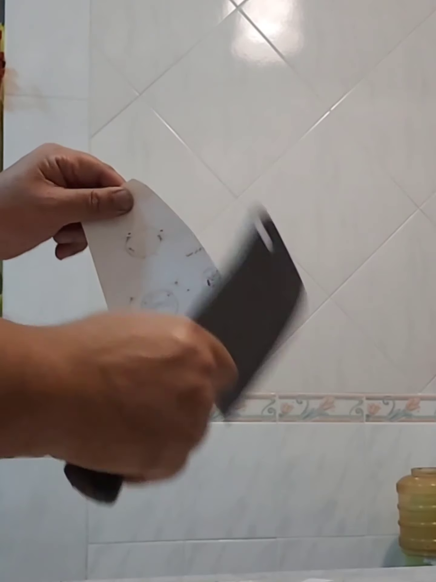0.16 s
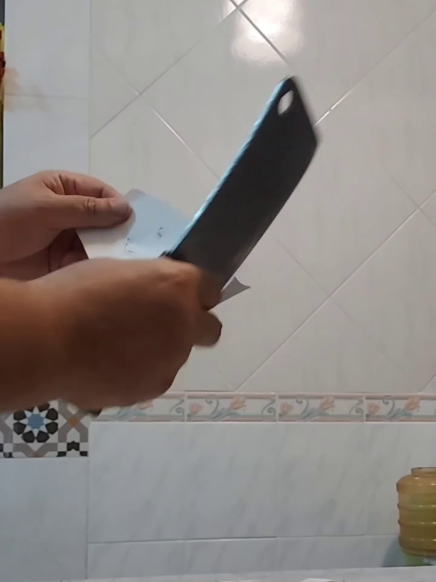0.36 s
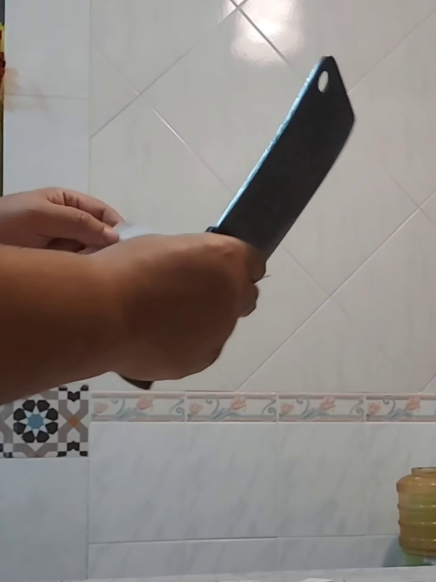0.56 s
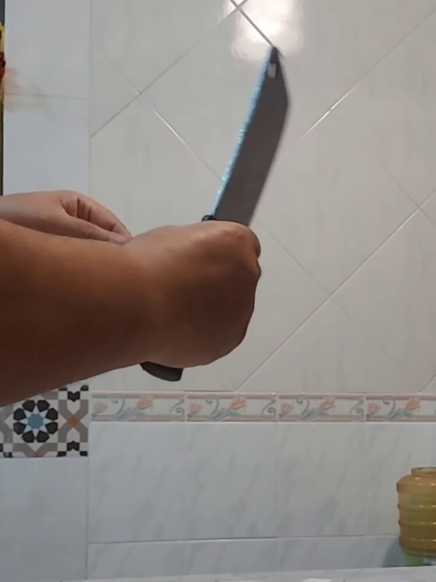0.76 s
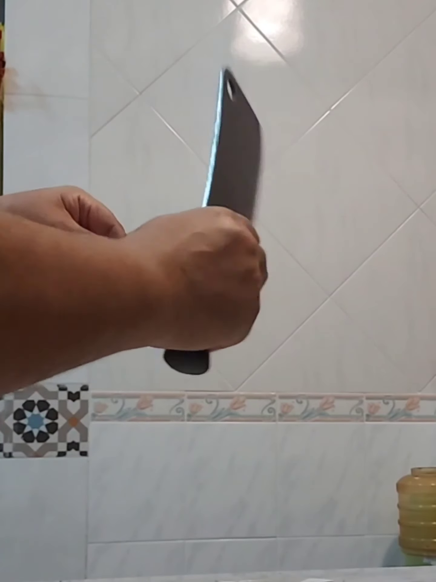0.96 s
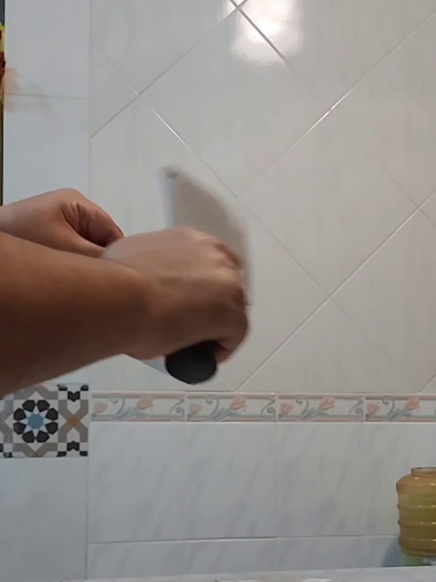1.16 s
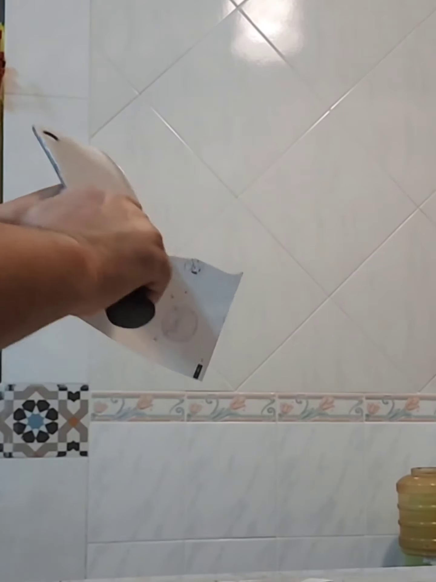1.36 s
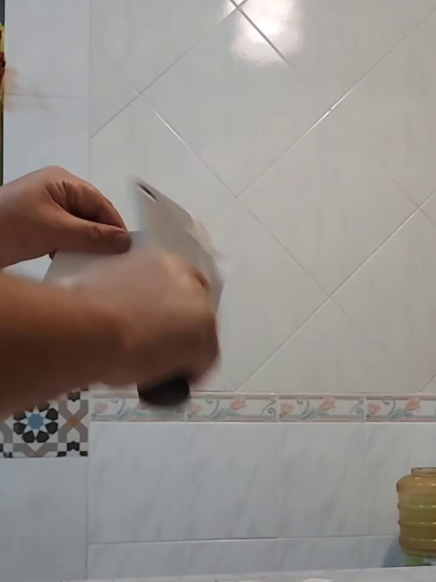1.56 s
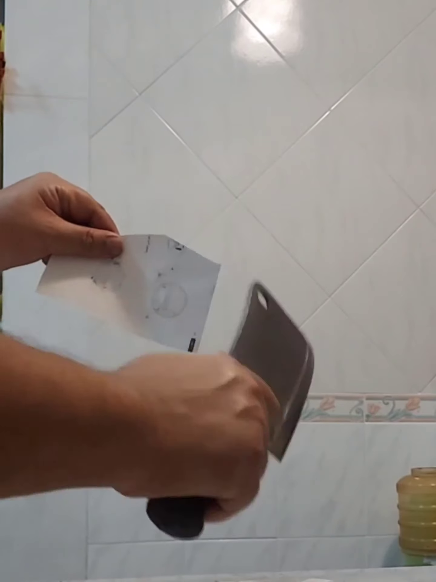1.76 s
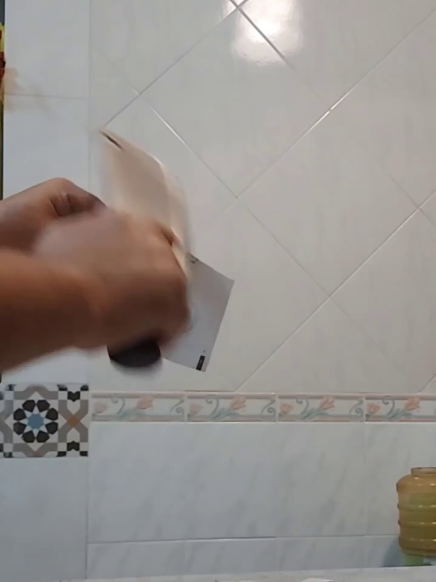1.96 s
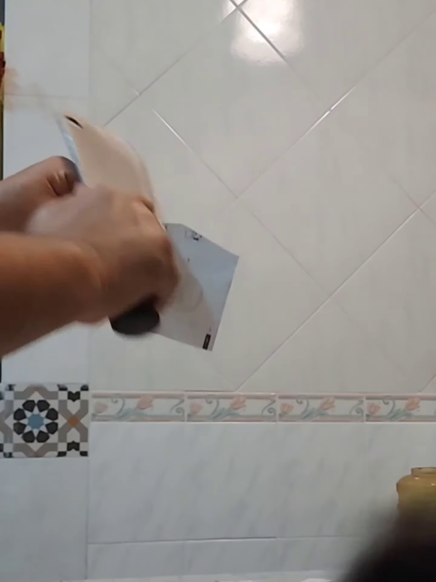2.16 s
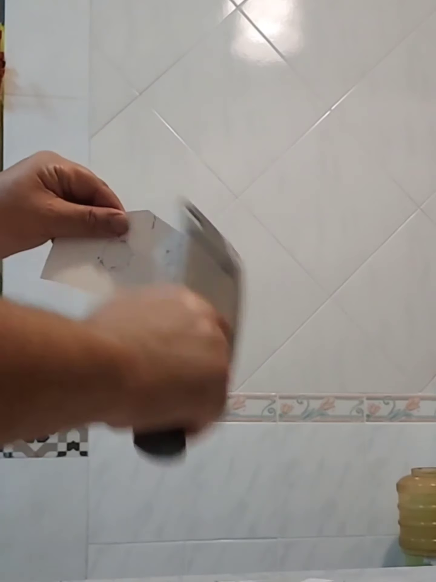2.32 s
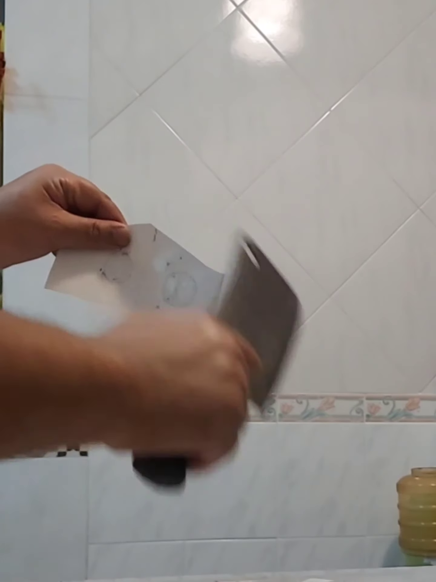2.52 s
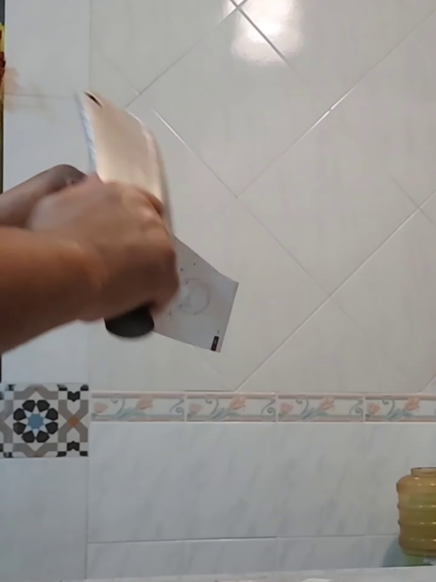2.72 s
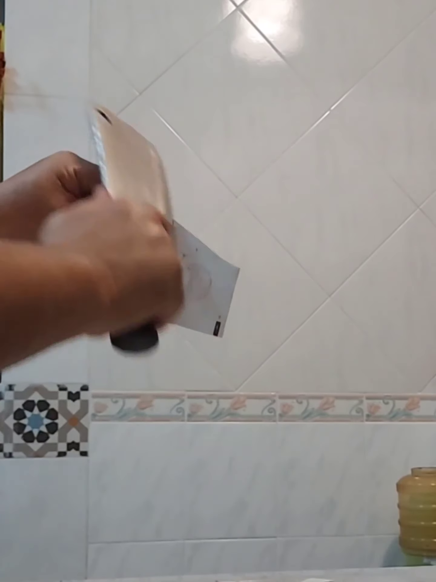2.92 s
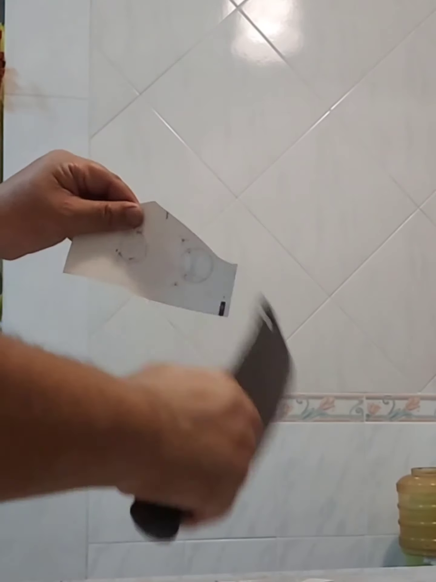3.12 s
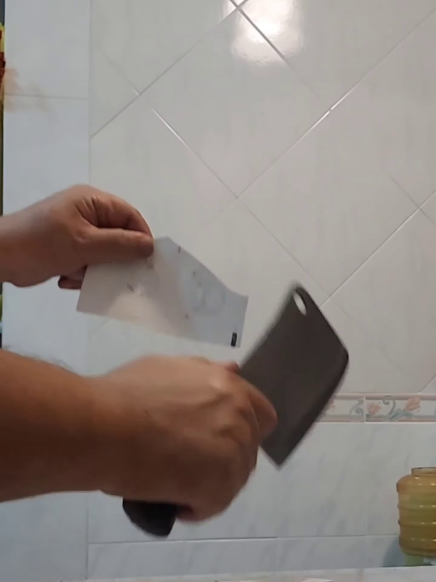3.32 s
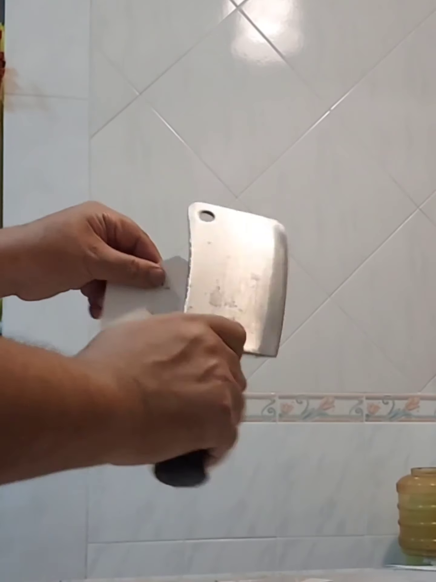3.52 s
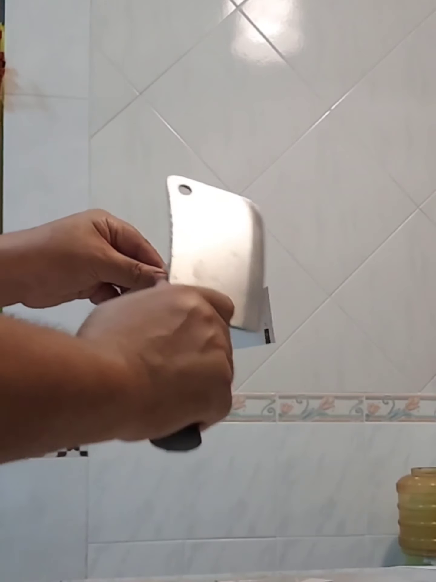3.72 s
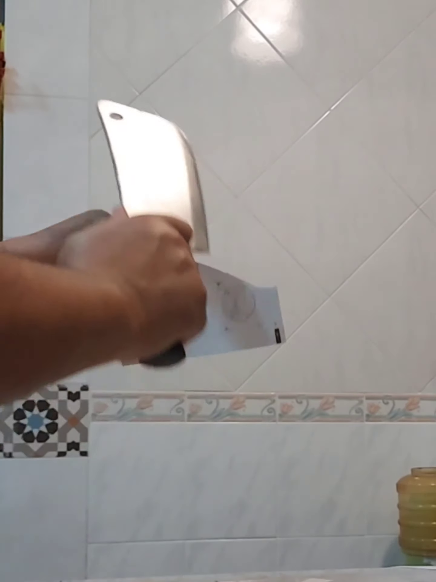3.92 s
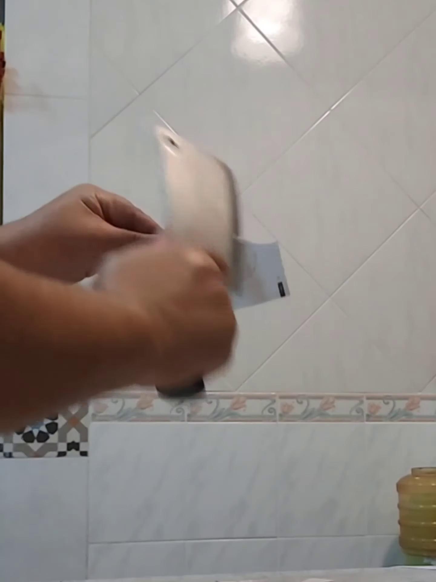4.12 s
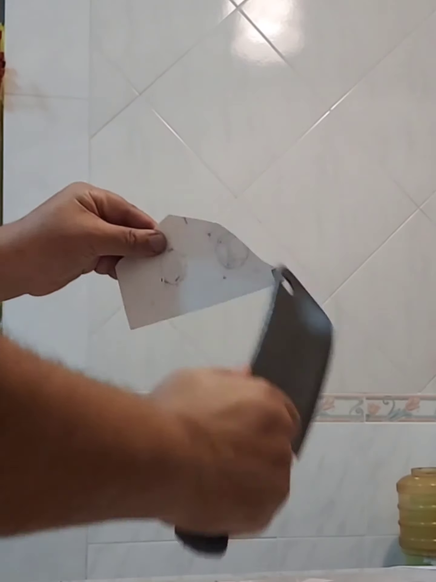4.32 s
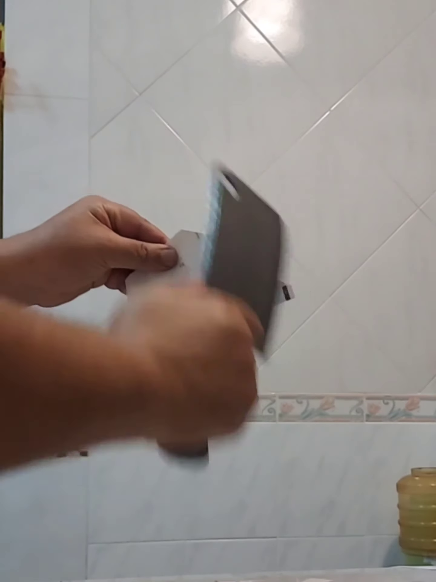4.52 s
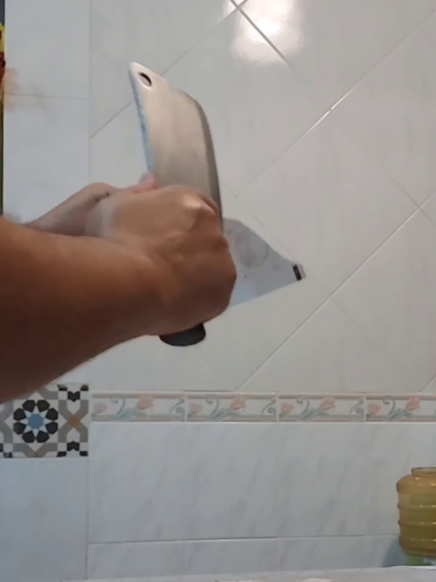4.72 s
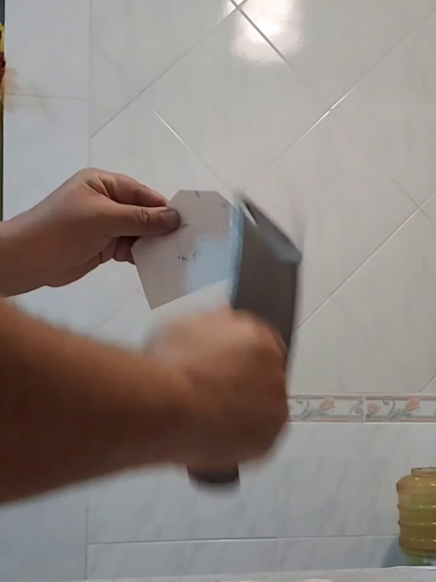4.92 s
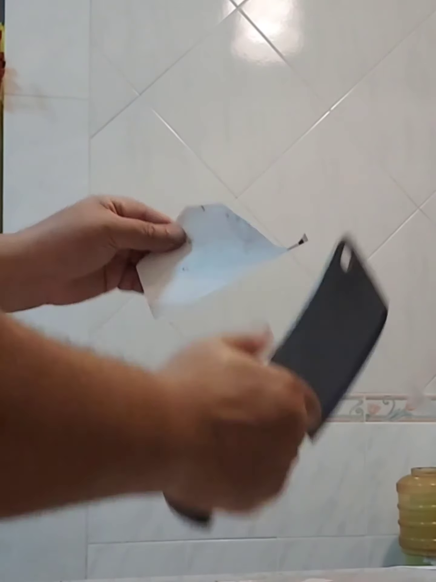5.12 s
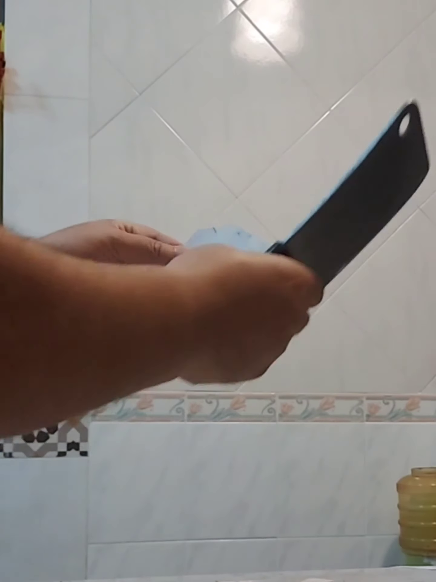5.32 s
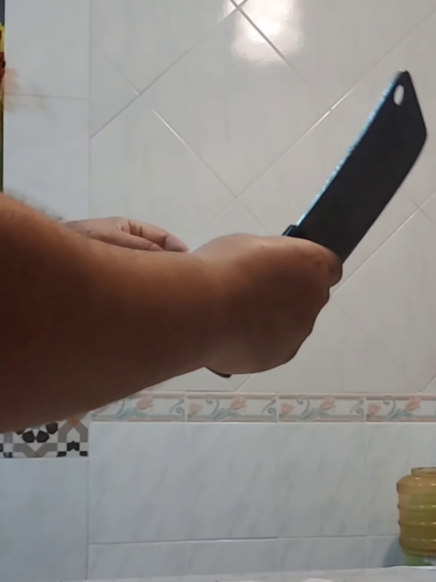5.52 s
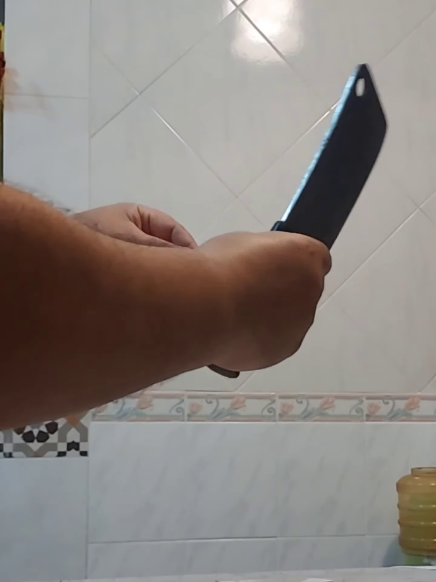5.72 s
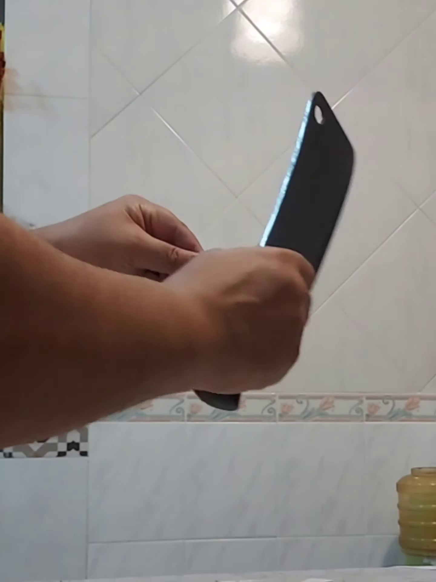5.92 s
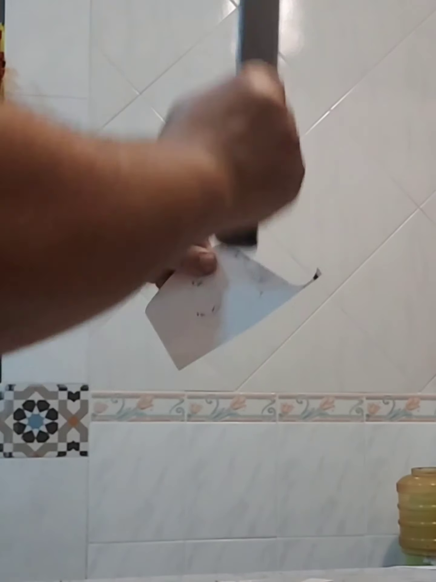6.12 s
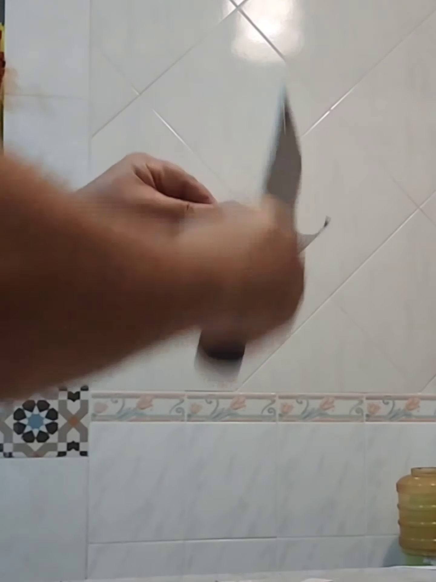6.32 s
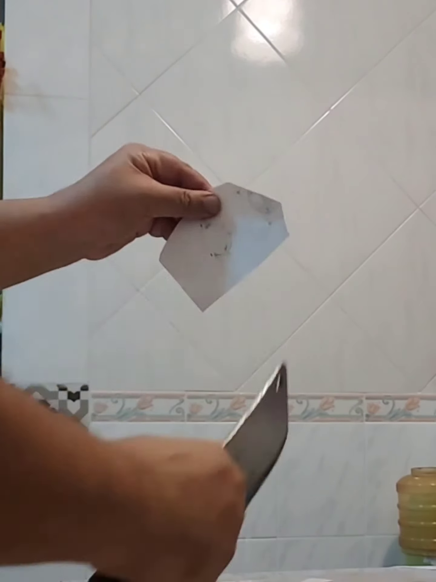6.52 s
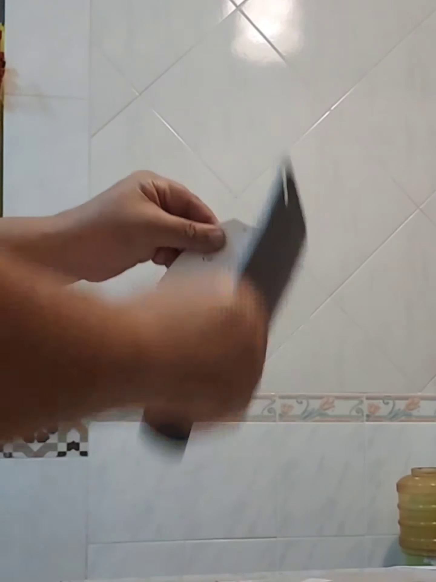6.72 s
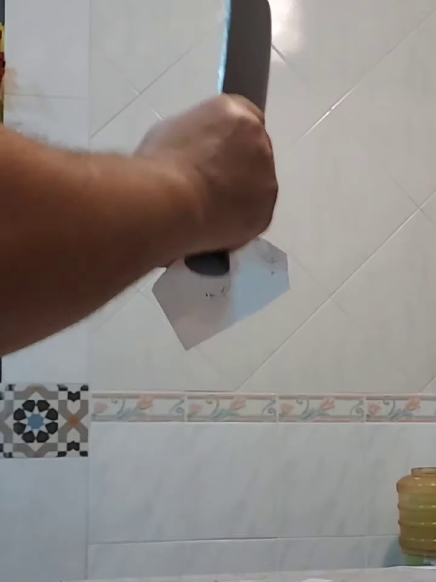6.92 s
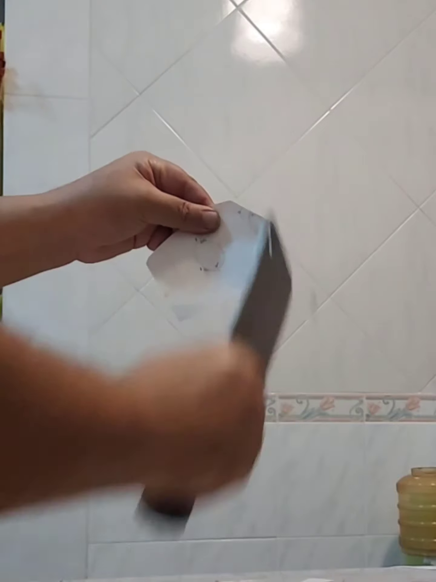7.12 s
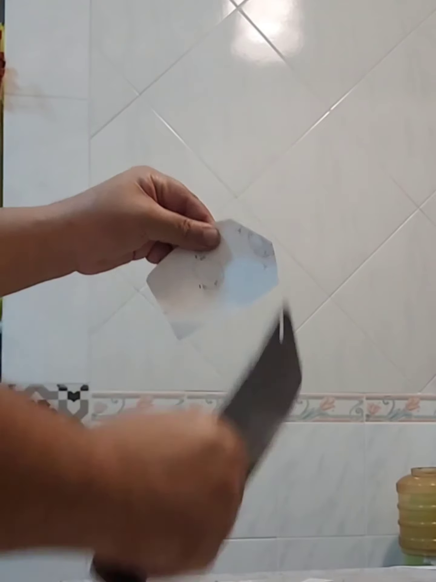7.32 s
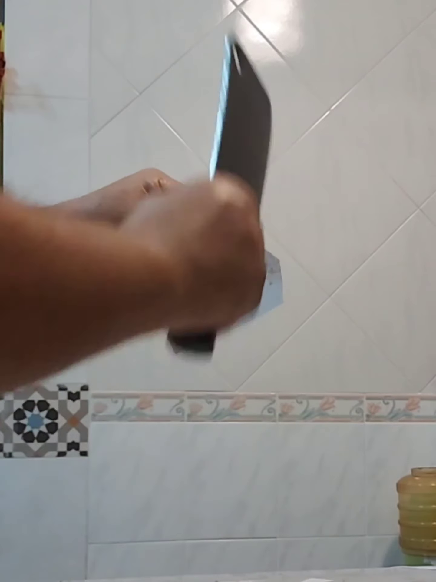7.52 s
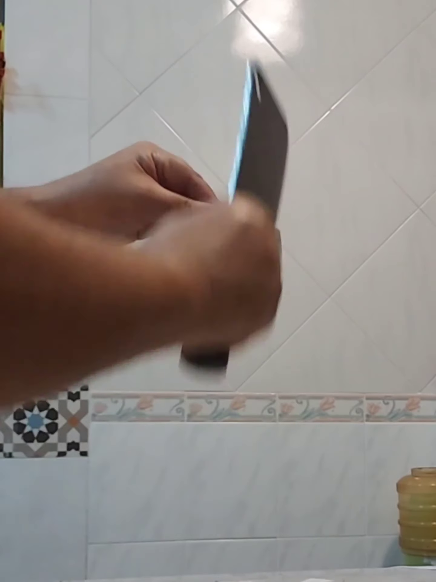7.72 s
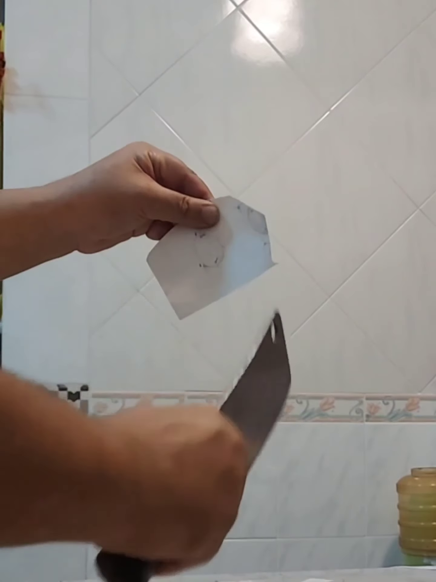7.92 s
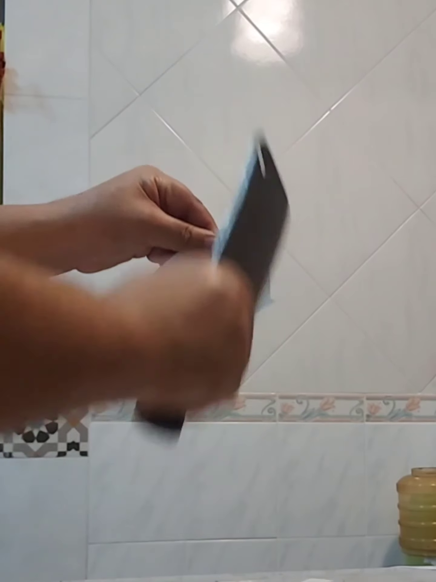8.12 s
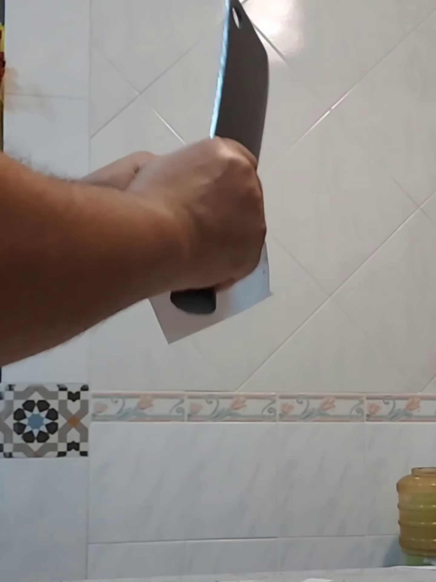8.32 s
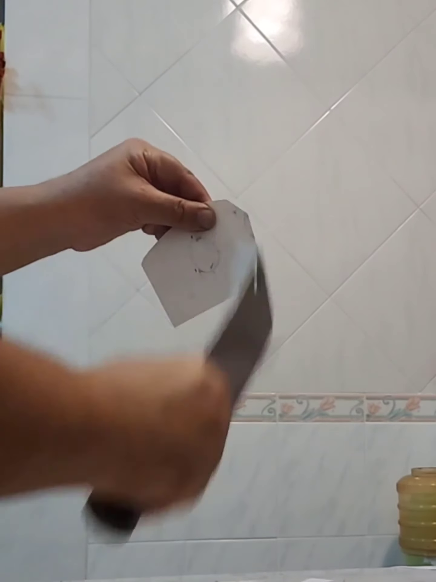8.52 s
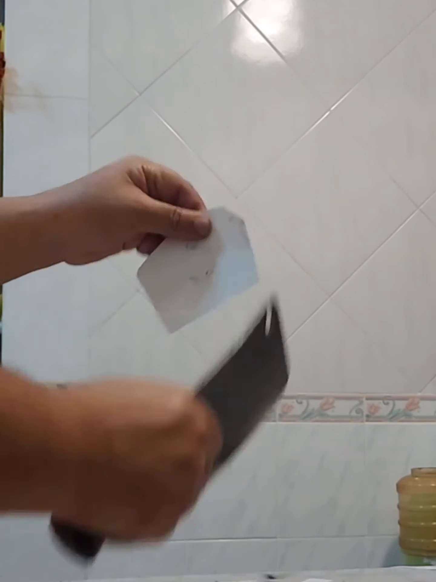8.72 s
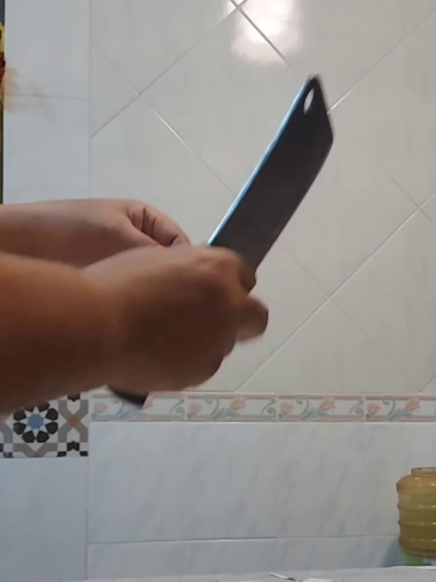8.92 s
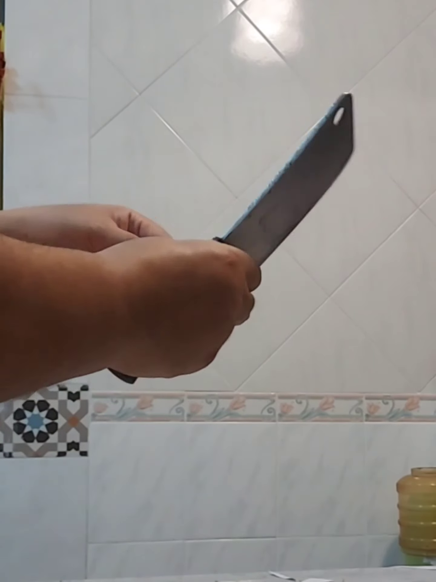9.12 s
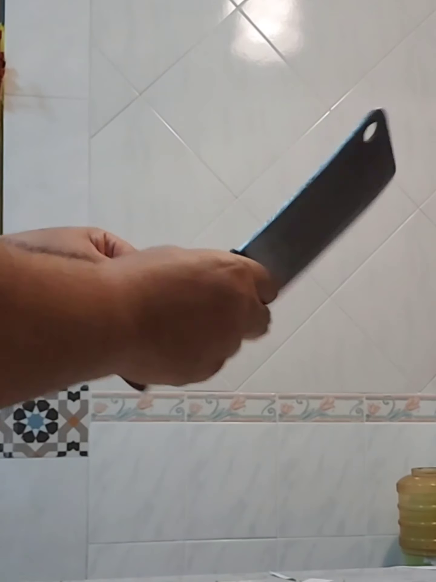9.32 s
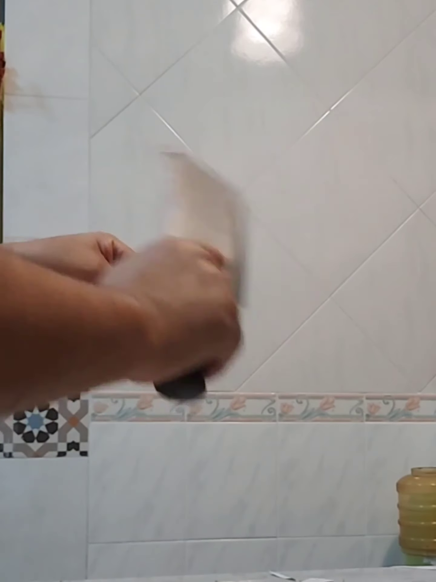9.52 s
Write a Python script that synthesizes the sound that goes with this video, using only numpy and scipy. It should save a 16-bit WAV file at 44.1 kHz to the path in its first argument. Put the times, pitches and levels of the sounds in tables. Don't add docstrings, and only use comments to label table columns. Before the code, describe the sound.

The tail of one slice, then a pause and spaced paper cuts: some short and dry, some drawn out and swelling, one abrupt hard chop past the middle, then three quicker crackling slices. Small ticks and soft paper handling come between. The sound is close and bright, with short tiled-room reverberation over quiet room tone and a wavering low engine drone that grows later.

```python
import sys
import numpy as np
from scipy import signal
from scipy.fft import rfft, irfft, next_fast_len
from scipy.io import wavfile
from scipy.ndimage import uniform_filter1d, map_coordinates

SR = 44100
rng = np.random.default_rng(int(sys.argv[2]) if len(sys.argv) > 2 else 0)


def to_wav(sig):
    pcm = np.clip(np.atleast_2d(sig), -1, 1) * 32767
    pcm = np.round(pcm).astype(np.int16)
    wavfile.write(sys.argv[1], SR, pcm.T)


def rack_gain(trim_db):
    fader = np.asarray(trim_db, float)
    return 10 ** (fader / 20)


N = 426002
SIZE = next_fast_len(N + SR)

# (frequency [Hz], density [dB])
TEAR_SPECTRUM = [(2000, -12), (3300, -1.5), (4500, -1), (6300, -3), (8500, -1), (12000, -36)]
# (frequency [Hz], density [dB])
HISS_SPECTRUM = [(5000, -20), (8000, -3), (11000, 2), (14000, -4), (15800, 0.5)]
# (frequency [Hz], density [dB])
SHUDDER_SPECTRUM = [(600, -23.5), (1100, -11.5), (1600, 2), (2000, 4.5), (3000, 2.5), (4000, -4),
                    (6000, -28)]


def in_time(rows):
    s, values = np.transpose(rows)
    return np.interp(np.arange(N) / SR, s, values)


def in_strokes(tables, fade_in_s, fade_out_s):
    gain, which, progress = np.zeros(N), np.zeros(N, int), np.zeros(N)
    for k, rows in enumerate(tables):
        s, db = np.transpose(rows)
        start = max(int((s[0] - fade_in_s) * SR), 0)
        stop = min(int((s[-1] + fade_out_s) * SR), N)
        span = slice(start, stop)
        t = np.arange(start, stop) / SR
        opening = np.clip((t - s[0]) / fade_in_s + 1, 0, 1)
        closing = np.clip((s[-1] - t) / fade_out_s + 1, 0, 1)
        gain[span] = opening * closing * rack_gain(np.interp(t, s, db))
        which[span] = k
        progress[span] = np.clip((t - s[0]) / (s[-1] - s[0]), 0, 1) - .5
    return gain, which, progress


def at_hz(points, hz):
    table_hz, values = np.transpose(points)
    return np.interp(np.log(hz + 1), np.log(table_hz), values)


def rms_one(x):
    return x / np.sqrt(np.mean(x ** 2) + 1e-20)


def colour(x, points):
    cepstrum = irfft(np.log(rack_gain(at_hz(points, np.fft.rfftfreq(8192, 1 / SR)))))
    cepstrum[1:4096] *= 2
    response = irfft(np.exp(rfft(cepstrum[:4097], 8192)))
    return signal.oaconvolve(np.atleast_2d(x), response[None, :4096], axes=-1)[:, :N]


def drift(rate_hz):
    steps = rng.standard_normal(int(N / SR * 2000))
    return np.interp(np.arange(N) / SR * rate_hz, np.arange(len(steps)), steps)


def resonance(x, hz, width_hz):
    r = np.exp(-np.pi * width_hz / SR)
    poles = [1, -2 * r * np.cos(2 * np.pi * hz / SR), r * r]
    return signal.lfilter([(1 - r * r) / 2, 0, (r * r - 1) / 2], poles, x + 1e-18)


def alike_pair(length, size):
    # (frequency [Hz], left-right likeness [0-1])
    likeness = [(30, .5), (70, .97), (300, .93), (640, .5), (1400, .35), (3000, .08), (15000, .03)]
    alike = np.clip(at_hz(likeness, np.fft.rfftfreq(size, 1 / SR)), 0, 1)
    mid, side = rfft(rng.standard_normal((2, length)), size)
    return np.sqrt(.5 + alike / 2) * mid + np.sqrt(.5 - alike / 2) * side * [[1], [-1]]


def fibres(per_s, spread_db, clump_db, clumps_per_s):
    sizes = rack_gain(spread_db * np.minimum(rng.exponential(1, N), 2.5)) * rng.standard_normal(N)
    breaks = rng.random(N) < per_s / SR
    return rms_one(sizes * breaks * rack_gain(clump_db * drift(clumps_per_s)))


def cuts():
    # (time [s], tearing level [dB])
    pressure = [
        [(0.0, -44), (0.008, -42), (0.018, -49)],
        [(1.64, -45.5), (1.653, -39), (1.666, -33), (1.679, -36.0), (1.692, -38.5), (1.706, -32.5),
         (1.719, -34.5), (1.732, -40.5), (1.745, -41)],
        [(2.281, -53), (2.304, -45), (2.326, -42), (2.349, -37), (2.372, -36.0), (2.394, -35.5), (2.417, -36.5),
         (2.439, -34), (2.462, -39.5)],
        [(3.0, -53.5), (3.028, -47.5), (3.056, -42.5), (3.084, -38.5), (3.112, -36.5), (3.141, -34.5),
         (3.169, -36.5), (3.197, -35), (3.225, -45)],
        [(4.264, -50.5), (4.281, -45.0), (4.299, -37), (4.316, -39), (4.333, -35), (4.35, -37.0), (4.367, -40),
         (4.385, -35.5), (4.402, -42)],
        [(4.897, -62), (4.923, -52.5), (4.949, -38.5), (4.975, -34), (5.001, -41), (5.027, -39), (5.053, -39.5),
         (5.079, -39), (5.105, -40.0)],
        [(6.467, -41), (6.478, -23), (6.489, -26), (6.501, -29.5), (6.512, -34)],
        [(7.184, -43.5), (7.197, -38), (7.211, -38.5), (7.224, -40.5), (7.238, -38), (7.252, -43),
         (7.265, -43.5)],
        [(7.849, -50), (7.867, -43), (7.884, -38), (7.902, -41.5), (7.92, -38.5), (7.937, -34), (7.955, -40),
         (7.972, -42), (7.99, -41)],
        [(8.513, -44.5), (8.532, -41), (8.55, -41.5), (8.569, -35.5), (8.588, -36), (8.606, -40),
         (8.625, -40.5), (8.643, -36.5), (8.662, -44.5)],
    ]
    # (time [s], shudder level [dB])
    edge_drag = [
        [(0.0, -45), (0.018, -49)],
        [(1.64, -54.5), (1.653, -35.5), (1.666, -46.0), (1.679, -42.0), (1.692, -45.5), (1.706, -49.0),
         (1.719, -44.0), (1.732, -44.5), (1.745, -46.0)],
        [(2.281, -54.0), (2.304, -47.5), (2.326, -50.0), (2.349, -48.0), (2.372, -38.5), (2.394, -38.5),
         (2.417, -38.5), (2.439, -38.0), (2.462, -48.5)],
        [(3.0, -66.0), (3.028, -54.0), (3.056, -48.0), (3.084, -40.0), (3.112, -45.0), (3.141, -43.5),
         (3.169, -35.5), (3.197, -44.5), (3.225, -58.0)],
        [(4.264, -52.5), (4.281, -44.0), (4.299, -43.5), (4.316, -46.0), (4.333, -47.5), (4.35, -38.0),
         (4.367, -40.5), (4.385, -45.0), (4.402, -47.0)],
        [(4.897, -63.5), (4.923, -53.5), (4.949, -44.5), (4.975, -39.5), (5.001, -33.5), (5.027, -41.5),
         (5.053, -39.0), (5.079, -46.5), (5.105, -43.0)],
        [(6.467, -37.0), (6.478, -30.0), (6.489, -38.5), (6.501, -36.5), (6.512, -41.5)],
        [(7.184, -43.5), (7.197, -44.5), (7.211, -37.0), (7.224, -39.0), (7.238, -39.5), (7.252, -42.5),
         (7.265, -50.0)],
        [(7.849, -43.0), (7.867, -49.5), (7.884, -37.0), (7.902, -38.5), (7.92, -39.5), (7.937, -43.5),
         (7.955, -48.5), (7.972, -49.0), (7.99, -36.0)],
        [(8.513, -45.5), (8.532, -44.5), (8.55, -38.5), (8.569, -35.5), (8.588, -35.5), (8.606, -37.5),
         (8.625, -44.0), (8.643, -35.0), (8.662, -49.0)],
    ]
    # (body [dB], fine hiss [dB], hiss change bite to exit [dB])
    sheet = [(1, 5, -7), (-11.5, 3, 6), (-10.5, 4.5, -4.5), (-7.5, 4.5, -1), (-7, 4.5, 3.5), (-4, 9, 5.5),
             (-9, 3.5, 5), (-4.5, 4.5, 5), (-7.5, 3.5, -3), (-5, 3, 2)]
    # (frequency [Hz], density [dB])
    body_spectrum = [(150, -7), (300, 5), (600, 2.5), (1000, 1), (1500, -3.5), (2500, -25)]
    bite_s, body_change_db, waver_db, wavers_per_s = .002, 2, 1.0, 45
    tear, which, progress = in_strokes(pressure, bite_s, 0.01)
    shudder = in_strokes(edge_drag, bite_s, 0.014)[0]
    fine = fibres(9000, 2.2, 1.6, 150)
    finest = fibres(14000, 1.6, 1.0, 150)
    coarse = fibres(2500, 2.2, 2.8, 70) + 1.3 * finest
    body_db, hiss_db, hiss_change_db = np.transpose(sheet)[:, which]
    body_gain = tear * rack_gain(body_db + body_change_db * progress + waver_db * drift(wavers_per_s))
    shudder_gain = shudder * rack_gain(waver_db * drift(wavers_per_s))
    hiss_gain = tear * rack_gain(hiss_db + hiss_change_db * progress + waver_db * drift(wavers_per_s))
    shaken = rack_gain(-10.0) * body_gain * rms_one(colour(fine, body_spectrum))
    shaken = shaken + rack_gain(-7.5) * shudder_gain * rms_one(colour(coarse, SHUDDER_SPECTRUM))
    parted = tear * rms_one(colour(fine, TEAR_SPECTRUM))
    parted = parted + hiss_gain * rms_one(colour(finest, HISS_SPECTRUM))
    return (shaken + rack_gain(-10.0) * parted)[0]


def snaps():
    # (time [s], peak [dB], ring frequency [Hz], crack re ring [dB])
    buckles = [(0.2767, -31, 5070, 6.5), (1.6388, -38, 5520, -21), (1.656, -29, 2300, -15),
               (2.2805, -35, 5680, -14), (2.7816, -56, 2230, 4), (2.9985, -49, 2420, -2),
               (3.104, -24, 1880, -15), (4.265, -46, 2400, -22), (4.3, -22.5, 1950, -21),
               (4.9796, -23, 1800, -16), (9.2355, -52, 5500, -16), (6.4742, -17, 5600, -18),
               (6.7354, -32, 6500, 0.5), (7.128, -36, 2020, -18), (7.4728, -54, 2570, -6),
               (7.5994, -50, 2560, -23), (7.8505, -34, 2160, -18), (7.883, -17, 2700, -22),
               (7.933, -21, 2400, -16), (7.9802, -19, 2100, -26), (8.1673, -48, 2450, -1),
               (8.513, -30.5, 2360, -22), (8.586, -16, 2030, -21), (8.6391, -18, 3000, -17),
               (8.826, -50, 5000, 0), (8.875, -52, 5000, 0), (9.2292, -46, 2200, -20),
               (9.4312, -41, 2000, -25), (9.4922, -40, 3900, -25), (0.3672, -49, 5000, -2),
               (0.5153, -48, 5500, -12), (3.4996, -54, 5000, -3), (4.8946, -50, 5000, -11),
               (6.2141, -57, 5000, -2), (6.282, -55, 5000, -2), (6.306, -57, 5000, 3),
               (7.1862, -31, 4500, -14), (7.1997, -25, 2800, -16), (7.2358, -29, 2240, -16),
               (8.534, -35, 3000, -12), (5.0816, -31, 5000, 4), (8.6282, -22, 2000, -18),
               (4.3047, -27, 1730, -18), (8.1885, -45, 5000, 0), (7.588, -57, 5000, 0),
               (7.464, -55, 5000, 2), (8.889, -53, 5000, 2), (3.648, -56, 5000, 1), (3.109, -24, 1700, -18),
               (4.307, -31, 1500, -18)]
    out, t = np.zeros(N + 300), np.arange(300) / SR
    splinters = np.tile(rng.standard_normal((29, len(t))), (2, 1))
    for (s, peak_db, hz, crack_db), noise in zip(buckles, splinters):
        burst = (t == 0) + .08 * noise * np.exp(-t / .0012)
        crack = rack_gain(crack_db + 9.5) * signal.lfilter([1, 0, -.85], [1, -.1, .3], burst)
        cycles = t * hz
        ring = 3.6 * np.sin(2 * np.pi * cycles) * cycles * np.exp(-cycles / .65)
        out[round((s + .0012) * SR):][:len(t)] += rack_gain(peak_db - 4.5) * (crack + ring)
    return out[:N]


def flaps():
    # (time [s], peak [dB], ring frequency [Hz])
    whips = [(0.003, -33, 296), (1.694, -29.5, 249), (2.438, -32, 630), (2.452, -32.5, 262),
             (7.883, -33, 503), (7.981, -36, 870), (7.933, -30, 700), (8.586, -36, 900),
             (4.977, -31.5, 1030), (3.104, -28.5, 617), (3.197, -30, 266), (4.298, -28.5, 800),
             (4.335, -26.5, 297), (4.389, -29, 633), (4.975, -26, 620), (5.092, -27, 340),
             (6.4665, -21.5, 613), (6.505, -27.5, 624), (7.239, -33, 318), (7.845, -33, 323),
             (7.921, -37, 188), (8.63, -29.5, 460)]
    out, t = np.zeros(N + 3000), np.arange(3000) / SR
    for s, peak_db, hz in whips:
        cycles = t * hz
        push = np.sin(2 * np.pi * cycles) * cycles * np.exp(-cycles / 0.92)
        out[round(s * SR):][:len(t)] += rack_gain(peak_db - 1.5) * push
    return out[:N]


def blade(torn):
    # (frequency [Hz], level [dB], T60 [s])
    steel_modes = [(1739, -51.5, 0.28), (2295, -59, 0.25), (3646, -51.5, 0.48), (4440, -57, .2),
                   (4930, -56, .3)]
    out = 0
    for hz, db, t60_s in steel_modes:
        r, angle = rack_gain(-60 / (t60_s * SR)), 2 * np.pi * hz / SR
        poles = [1, -2 * r * np.cos(angle), r * r]
        out = out + signal.lfilter([0, rack_gain(db) * np.sin(angle)], poles, torn + 1e-18)
    return out


def rustle():
    # (time [s], peak [dB], rise [s], fall [s], middle tones re peak [dB])
    brushes = [(0.29, -60.5, 0.009, .16, 3), (0.55, -73, 0.18, 0.18, 4.5), (0.678, -69, 0.18, 0.15, -3),
               (1.056, -63, 0.053, 0.057, -1), (2.782, -61, .015, 0.043, -10), (3.36, -72, .05, .14, 4),
               (3.5, -64.5, .12, 0.18, -5), (3.68, -65.5, 0.17, 0.13, -1.5), (4.78, -77, .16, 0.086, 4),
               (5.948, -66, .041, 0.035, 0), (6.092, -67, .07, .03, -2), (6.212, -73, .009, .16, -1),
               (6.29, -66, .02, 0.12, -5), (6.76, -64.5, 0.11, 0.087, 7), (0.42, -72, .1, .16, -3),
               (5.45, -67.5, .16, .05, -0.5), (7.48, -66.5, .06, .08, -1.5), (7.596, -73, .04, 0.057, 2),
               (8.1, -68, .03, .16, 0), (8.168, -50, 0.0069, .01, -6), (8.2, -65, .02, .16, -3),
               (8.861, -70, .08, 0.051, -2), (8.892, -59, 0.046, .02, -3), (9.45, -71.5, 0.046, .14, 5.5),
               (9.505, -66, 0.085, .05, 2.5), (7.14, -68, .02, 0.071, 3), (9.235, -80, .01, .05, 7),
               (1.095, -74.5, .05, 0.13, 3), (1.22, -81, 0.11, .16, 2), (3.4, -73, .04, .1, 0),
               (3.6, -75, 0.087, 0.093, -1), (4.915, -60, .02, .03, 3)]
    high, middle = np.zeros((2, N))
    for s, db, rise_s, fall_s, middle_db in brushes:
        rise_s, fall_s = np.clip([rise_s, fall_s], .002, .16)
        start = max(int((s - 2 * rise_s) * SR), 0)
        stop = min(int((s + 2 * fall_s) * SR), N)
        t = np.arange(start, stop) / SR - s
        away = np.where(t < 0, -t / rise_s, t / fall_s)
        brush = rack_gain(db - 20 * away) * np.clip(2 - away, 0, 1)
        high[start:stop] += brush
        middle[start:stop] += brush * rack_gain(middle_db)
    grains = fibres(400, 2.2, 2.2, 26) * 0.25 + fibres(15000, 1.9, 3, 60)
    crackle = rms_one(colour(grains, HISS_SPECTRUM))
    friction = rms_one(colour(grains, TEAR_SPECTRUM) + .5 * colour(grains, SHUDDER_SPECTRUM))
    return rack_gain(-5) * (high * crackle + middle * friction)[0]


def room(x):
    # (frequency [Hz], T60 [s])
    room_t60 = [(100, 0.9), (300, 1), (1000, 0.72), (3500, 0.59), (9000, 0.51), (15000, 0.35)]
    # (frequency [Hz], tail re direct [dB])
    room_share = [(100, 11.5), (400, 0.5), (1000, -3), (2500, -2), (7000, 1.5), (15000, 0)]
    first_echo_s = 0.0023
    t, hz = np.arange(SR) / SR, np.fft.rfftfreq(SR, 1 / SR)
    noise, tail = alike_pair(SR, SR), 0
    for centre_hz in 60 * np.sqrt(2) ** np.arange(17):
        band = np.clip(1 - 2 * np.abs(np.log2((hz + 1) / centre_hz)), 0, 1)
        tail = tail + irfft(noise * band, SR) * rack_gain(-60 * t / at_hz(room_t60, centre_hz))
    tail = tail * np.clip(t / first_echo_s - 1, 0, 1)
    tail = tail / np.sqrt(np.sum(tail ** 2) / 2)
    share = rack_gain(at_hz(room_share, np.fft.rfftfreq(SIZE, 1 / SR)))
    return irfft(rfft(x, SIZE) * rfft(tail, SIZE) * share, SIZE)[:, :N]


def rumble():
    # (frequency [Hz], width [Hz], level [dB])
    swelling = [(95.47, 6.6, -50), (234.7, 14.5, -58.5), (282.7, 9.2, -60), (328.5, 6.3, -60)]
    # (frequency [Hz], width [Hz], level [dB])
    steady = [(138, 20.5, -56.5), (185.4, 11.5, -58)]
    # (time [s], level [dB])
    engine = [(0, -57), (0.15, -77), (1.4, -75), (2.4, -89), (2.75, -80), (3.2, -62), (4.1, -71.5),
              (4.4, -57), (5.5, -60.5), (6.2, -56), (7.5, -56), (8.5, -58.5), (9.0, -57), (9.66, -67)]
    engine_share = [0.092, 0.84, 0.71, 1.37, 0.56, 0.3]
    # (time [s], gain [dB])
    mode_surges = [
        [(0.0, 13), (1.1, 3.5), (1.72, 8), (2.15, 7.5), (2.45, 9), (3.27, 7), (3.66, 8), (3.97, 7), (4.22, 8),
         (4.6, 7), (4.9, 11.5), (5.08, 8.5), (5.32, 12), (5.97, 8), (6.75, 6), (7.04, 10), (7.6, 4.5),
         (8.32, 6), (8.69, 4.5), (9.42, 7.5)],
        [(1.69, 11), (2.47, 11.5), (3.66, 5.5), (3.98, 7), (4.76, 5.5), (5.38, 11), (5.97, 8), (6.55, 7),
         (7.6, 6.5), (8.05, 3.5), (8.34, 0), (8.7, 7.5), (9.45, 13)],
        [(2.47, 2), (3.9, 10), (4.33, 9), (5.11, -12), (5.5, -6), (6.2, 4), (6.55, 2), (7.26, 12.5),
         (8.26, 10.5), (8.7, 11), (8.88, 12.5), (9.05, 14.5), (9.6, 11)],
        [(1.69, 15), (3.23, 2), (3.66, 6.5), (3.93, 16), (4.76, 6), (5.2, 7), (5.97, 6), (6.25, -16),
         (7.75, 5.5), (8.08, -18), (8.3, 6.5), (8.69, 7), (9.04, 3), (9.25, -18)],
    ]
    surge_s = [0.13, 0.18, 0.14, 0.19, .1, .1]
    # (time [s], rate [Hz])
    speed = [(4.3, 47.2), (5.4, 47.01), (6.6, 47.27), (7.6, 47.94), (8.6, 47.85), (9.66, 48.5)]
    mode_pull = [0, 1, 1, .7, 0, 0]
    engine_db = in_time(engine)
    ahead = np.cumsum(in_time(speed) / 47 - 1)
    ahead -= ahead[-1]
    n = np.arange(N)
    knots_s = np.arange(0, N, 200) / SR
    noise = irfft(alike_pair(N, SIZE), SIZE)[:, :N]
    out = 0
    modes = zip(swelling + steady, engine_share, mode_pull, surge_s, mode_surges + [[], []])
    for (hz, width_hz, db), share, pull, half_s, surges in modes:
        surge_db = 0 * knots_s
        for s, gain_db in surges:
            surge_db = surge_db + gain_db * np.clip(1 - np.abs((knots_s - s) / half_s), 0, 1)
        level_db = share * (engine_db + 60) + np.interp(n / SR, knots_s, surge_db)
        mode = rms_one(resonance(resonance(noise, hz, width_hz), hz, 2 * width_hz))
        if pull:
            mode = np.array([np.interp((n + pull * ahead) % (N - 1), n, side) for side in mode])
        beating = uniform_filter1d(np.mean(mode ** 2, axis=0), size=1500)
        out = out + rack_gain(db + level_db) * rms_one(mode / (beating + .2) ** .28)
    return out


def air():
    # (frequency [Hz], density [dB])
    air_spectrum = [(15, -44), (25, -15), (74, -2), (102, 2), (153, -6), (659, -12.5), (1370, -26.5),
                    (1790, -24.5), (2840, -29.5), (6050, -40.5), (8360, -38), (14800, -49.5), (16000, -42)]
    shape = rack_gain(at_hz(air_spectrum, np.fft.rfftfreq(SIZE, 1 / SR)))
    tone = rms_one(irfft(alike_pair(N, SIZE) * shape, SIZE)[:, :N])
    return rack_gain(-51.5) * tone * rack_gain(0.58 * drift(2.545))


def scene():
    cut = cuts()
    torn = cut + blade(cut) + rustle()
    struck = snaps() + flaps()
    paper = torn + struck
    lag_samples = 5 + 2.2 * drift(40)
    right = map_coordinates(paper, [np.arange(N) - lag_samples], order=3)
    direct = rack_gain(6.5) * np.array([paper, right])
    return direct + rack_gain(1) * room(torn + rack_gain(-6) * struck) + air() + rumble()


def low_pass(x):
    return signal.sosfilt(signal.butter(12, 17000, fs=SR, output="sos"), x)


def record(dry):
    # (frequency [Hz], gain [dB])
    left_colour = [(60, -1), (400, -1), (900, 2.5), (1350, 7.5), (1800, 5), (2500, 1), (5000, 2.5),
                   (8300, -6.5), (12000, 0), (16000, -0.5)]
    # (frequency [Hz], gain [dB])
    right_colour = [(60, -2), (400, 0.5), (900, 3.5), (1200, 7.5), (1700, 4), (2900, 3), (6500, 10.5),
                    (7600, -3), (8600, -9.5), (9800, 0), (11500, 5), (13300, 7.5), (16000, 6)]
    port_hz, width_hz = 1250, 500
    r = np.exp(-np.pi * width_hz / SR)
    poles = [1, -2 * r * np.cos(2 * np.pi * port_hz / SR), r * r]
    left = signal.lfilter(poles[::-1], poles, colour(dry[0], left_colour)[0])
    right = colour(dry[1], right_colour)[0]
    top_cut = signal.ellip(12, .5, 60, 15850, fs=SR, output="sos")
    return low_pass(signal.sosfilt(top_cut, [left, right]))


dry = scene()
out = record(dry)
to_wav(out)
```